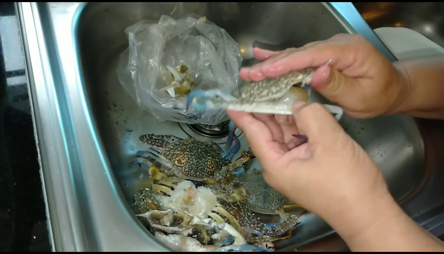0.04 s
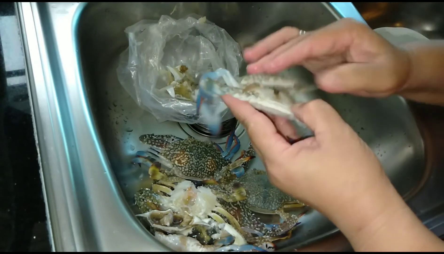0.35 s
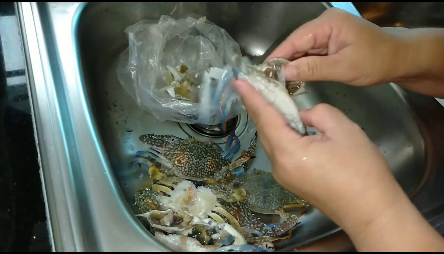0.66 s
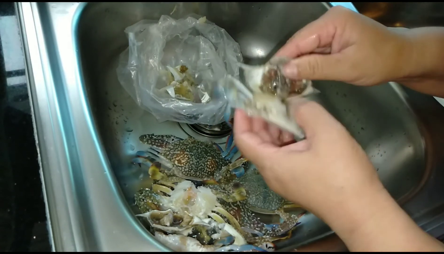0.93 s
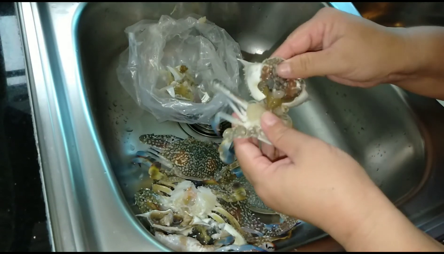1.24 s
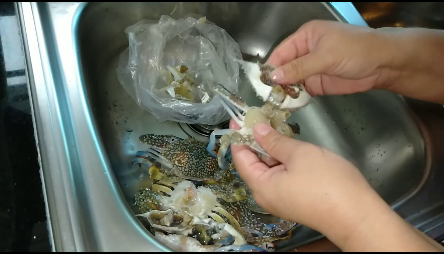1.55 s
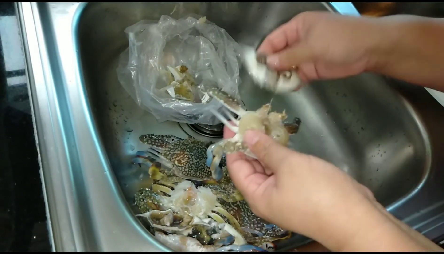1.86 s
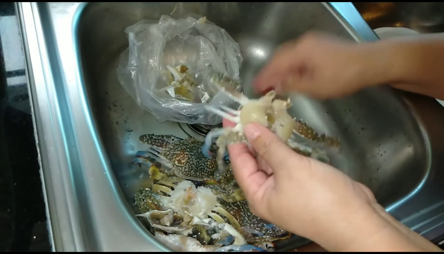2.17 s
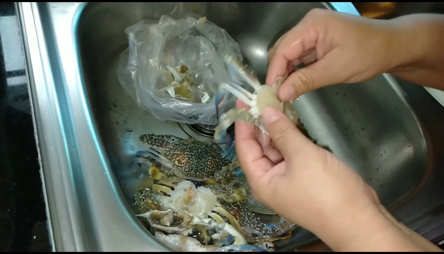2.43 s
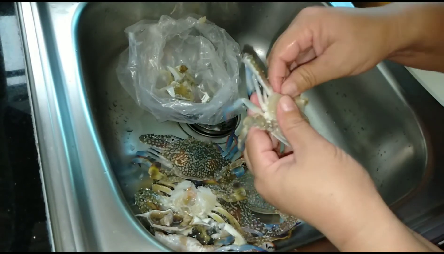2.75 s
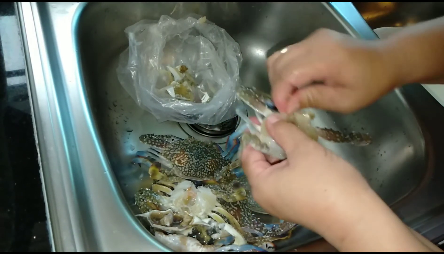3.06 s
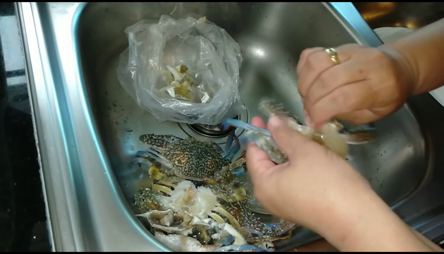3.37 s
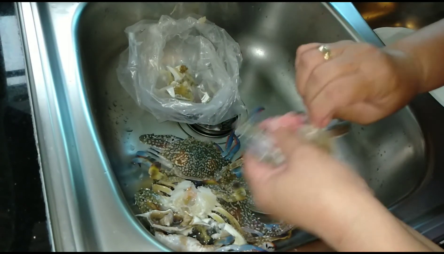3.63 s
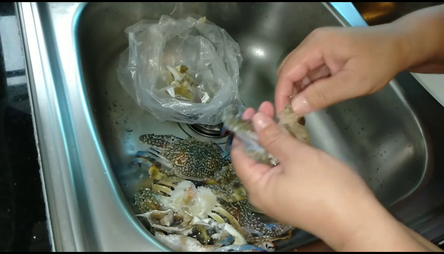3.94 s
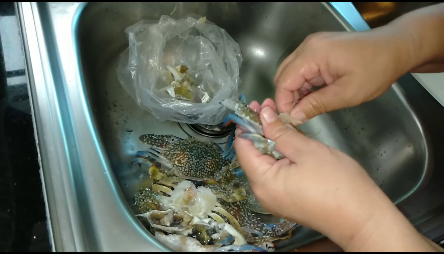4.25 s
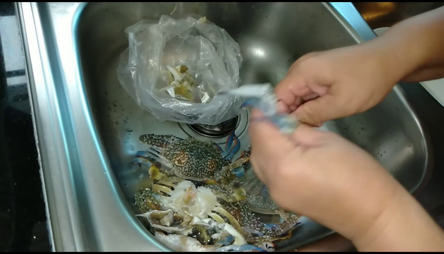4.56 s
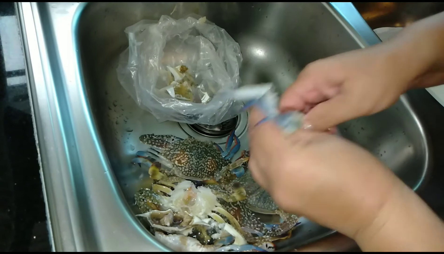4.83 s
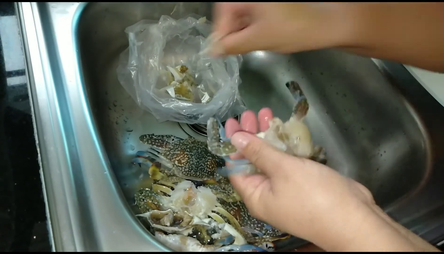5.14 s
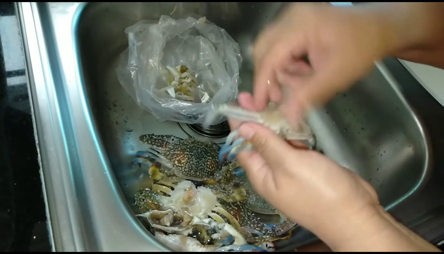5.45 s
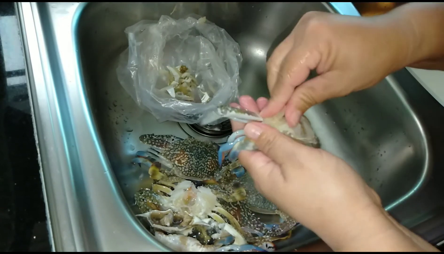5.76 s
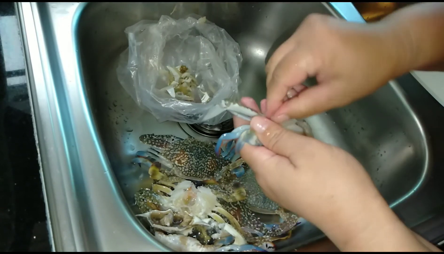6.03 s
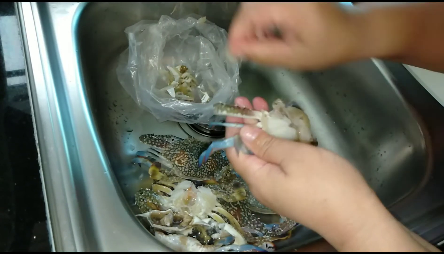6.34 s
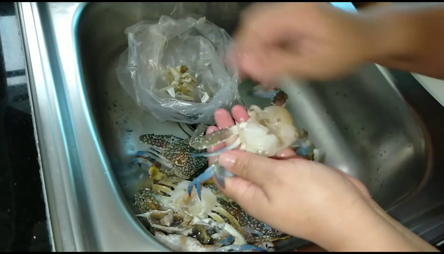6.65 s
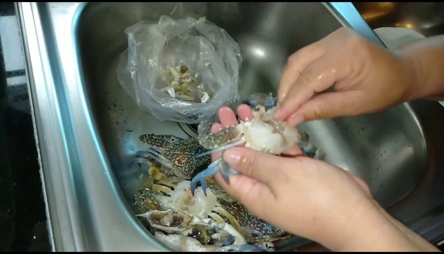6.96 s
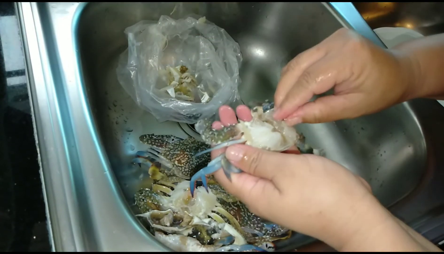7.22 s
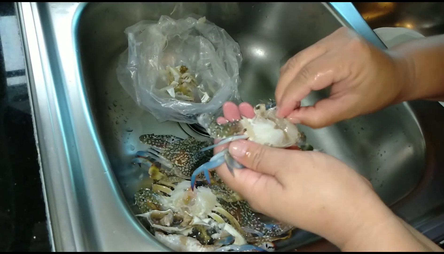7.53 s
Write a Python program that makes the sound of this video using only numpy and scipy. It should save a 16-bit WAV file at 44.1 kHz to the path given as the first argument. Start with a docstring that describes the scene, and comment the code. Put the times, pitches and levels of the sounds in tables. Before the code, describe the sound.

A fan whirs steadily in a kitchen while a raw crab is pulled apart close by, its shell snapping and its flesh faintly squelching. The loudest moment comes early, when the loose shell bounces in the steel basin with bright clacks and ringing thuds. Then a low, distant engine rumble creeps in and rises as small pieces keep cracking and two scraps drop into a plastic bag with short crinkles.

```python
"""A steel kitchen sink, a fan humming behind it. Close to the microphone, hands pull a raw crab apart:
flesh squelches, wet tissue tears and the shell cracks. Just after two seconds the top shell snaps off
and clatters into the basin, which thuds and rings. From about three seconds a distant engine comes in
and slowly gathers speed, booming in the room. Small pieces go on cracking, and near five and a half
and six and a half seconds scraps land in a plastic bag."""
import sys
import numpy as np
from scipy import signal
from scipy.fft import rfft, irfft
from scipy.io import wavfile

SR = 44100
rng = np.random.default_rng(int(sys.argv[2]) if len(sys.argv) > 2 else 0)


def unload_wav(signal):
    """Save mono or channel-first audio to the path in sys.argv[1] as 16-bit WAV at rate SR, clipped to [-1, 1]."""
    wavfile.write(
        sys.argv[1],
        SR,
        np.round(np.clip(np.atleast_2d(signal).T, -1, 1) * 32767).astype(np.int16),
    )


N = 334719


def amp(db):
    """Decibels to gain."""
    return 10 ** (np.asarray(db) / 20)


def unit(x):
    """Scales to rms 1."""
    return x / np.sqrt(np.mean(x ** 2) + 1e-20)


def unit_attack(x):
    """Scales a short sound to rms 1 over its first 10 ms."""
    return x / np.sqrt(np.mean(x[:SR // 100] ** 2) + 1e-20)


def curve_at(points, hz):
    """Interpolates a table on a log-frequency axis."""
    point_hz, value = np.transpose(points)
    return np.interp(np.log(hz + 1), np.log(point_hz), value)


def add(mix, start, sound):
    """Mixes a sound in at a start time in seconds."""
    part = mix[max(round(start * SR), 0):][:len(sound)]
    part += sound[:len(part)]


def band(x, lo_hz, hi_hz, order=2):
    """Causal band-pass."""
    sections = signal.butter(order, [lo_hz, min(hi_hz, SR / 2 - 1)], "band", fs=SR, output="sos")
    return signal.sosfilt(sections, x)


def resonate(x, hz, width_hz):
    """One resonance of gain 1."""
    return signal.lfilter(*signal.iirpeak(hz, hz / width_hz, fs=SR), x)


def drift(rate_hz):
    """Slow random wandering of rms 1."""
    hz = np.fft.rfftfreq(N, 1 / SR)
    return unit(irfft(rfft(rng.standard_normal(N)) * np.exp(-(hz / rate_hz) ** 2) * (hz > 0), N))


# Air from the fan behind the sink. Each row: frequency in Hz, relative spectral density in dB.
FAN_AIR = [(25, -1), (55, -1.3), (90, -1), (135, -1.5), (230, -10), (340, -8.5), (490, -12), (620, -7),
           (1250, -7), (1800, -12.5), (2600, -17.5), (3600, -24.5), (5000, -32.5), (9000, -49.5)]
# Its duct resonances. Each row: frequency in Hz, level in dB, width in Hz.
DUCT_TONES = [(188, -67.5, 3.4), (261, -77, 6.9), (393.3, -62.5, 25), (586.4, -72.5, 9.1), (990, -73, 17.2)]
# The fan comes up gently in the first second. Each row: time in seconds, gain in dB.
FAN_SWELL = [(0, -2), (.45, -2.6), (.85, 0), (7.59, 0.42)]

def fan(air_db=-52.5, mains_db=-57.5, mains_hz=100):
    """Steady rushing air with a mains hum and a few wavering duct resonances."""
    t, hz = np.arange(N) / SR, np.fft.rfftfreq(N, 1 / SR)
    air = unit(irfft(rfft(rng.standard_normal(N)) * amp(curve_at(FAN_AIR, hz)), N))
    out = amp(air_db) * air
    out += amp(mains_db) * np.sqrt(2) * np.sin(2 * np.pi * mains_hz * t)
    for centre_hz, db, width in DUCT_TONES:
        wavering_hz = centre_hz + width / 2 * drift(1 + width)
        out += amp(db) * np.sqrt(2) * np.sin(2 * np.pi * np.cumsum(wavering_hz) / SR)
    return out * amp(np.interp(t, *np.transpose(FAN_SWELL)))


# Wet flesh sucks air as it parts, close to the microphone.
# Each row: start in seconds, length in seconds, level in dB, pitch in Hz.
FLESH_SQUELCHES = [(.001, 0.063, -65.5, 3380), (0.663, 0.46, -64.5, 1840), (0.958, .11, -68, 3420),
                   (1.508, 0.011, -59.5, 6400), (2.01, 0.12, -79, 6500), (3.596, 0.15, -68, 6440),
                   (4.7, 0.127, -75, 6400), (4.928, 0.16, -76, 5500)]

def squelches(bubbles_per_s=2500, relative_width=0.46):
    """Tiny bubbles burst in a narrowing wet gap: a quick rise and a slower fade."""
    out = np.zeros(N)
    for start, length, db, hz in FLESH_SQUELCHES:
        progress = np.linspace(0, 1, round(length * SR))
        pops = rng.standard_normal(len(progress)) * (rng.random(len(progress)) < bubbles_per_s / SR)
        fizz = resonate(resonate(pops, hz, relative_width * hz), hz, relative_width * hz)
        envelope = np.minimum(progress / 0.031, 1) * (1 - progress)
        add(out, start, amp(db) * unit(fizz * envelope))
    return out


def wet_fingers(ticks_per_s=7, db=-47):
    """Wet fingers make faint stray ticks all along."""
    sizes = amp(2.8 * np.minimum(rng.exponential(1, N), 2))
    ticks = sizes * (rng.random(N) < ticks_per_s / SR)
    return amp(db) * band(ticks, 2500, 6700)


# Pulls that tear tissue and chip the shell, close up.
# Each row: start in seconds, length in seconds, level in dB.
PULLS = [(0.212, 0.12, -57), (0.721, 0.15, -79), (2.128, .05, -75.5), (2.246, 0.14, -58.5),
         (3.227, 0.07, -75), (3.29, 0.074, -65), (3.725, 0.042, -63), (4.813, 0.089, -68.5),
         (4.892, 0.064, -63.5), (5.335, 0.055, -60), (6.215, 0.11, -68.5), (6.299, 0.053, -64),
         (6.586, .02, -57), (6.629, 0.025, -54)]

def tearing(fibres_per_s=1000, unevenness_db=5):
    """Wet fibres part one after another in a fine crackle that fades through each pull."""
    out = np.zeros(N)
    for start, length, db in PULLS:
        count = round(length * SR)
        progress = np.linspace(0, 1, count)
        sizes = amp(unevenness_db * np.minimum(rng.exponential(1, count), 3))
        snaps = sizes * rng.choice([-1, 1], count) * (rng.random(count) < fibres_per_s / SR)
        crackle = band(snaps, 5500, 17500, order=1)
        envelope = np.minimum(progress / 0.041, 1) * (1 - progress)
        add(out, start, amp(db) * unit(crackle * envelope))
    return out


def chip_rows(chips_per_s=40, ring_db=6, snap_db=8, scatter_db=5,
              low_hz=1440, high_hz=2030, crumble_s=0.0027):
    """Rows for fractures(): faint breaks at random in each pull, weaker as the tissue gives way."""
    rows = []
    for start, length, db in PULLS:
        count = max(round(chips_per_s * length), 1)
        for progress, pitch, weakness in rng.random((count, 3)):
            level = db - scatter_db * weakness + 10 * np.log10(1 - progress)
            hz = low_hz + pitch * (high_hz - low_hz)
            rows.append((start + progress * length, level + ring_db, level + snap_db, hz, crumble_s))
    return rows


def fractures(rows, ring_db, snap_db, fizz_db, knock_db, ring_width_hz, splinters_per_s, splinter_size):
    """Each break is a jolt and a dying run of splinters; they ring the piece and radiate a snap."""
    out, t = np.zeros(N), np.arange(SR // 20) / SR
    for start, ring, snap, hz, crumble_s in rows:
        sizes = splinter_size * rng.standard_normal((2, len(t)))
        splinters = rng.random(len(t)) < splinters_per_s / SR
        jolts = sizes * splinters * np.exp(-t / crumble_s)
        jolts[:, 0] = 1  # the opening jolt
        force, crackle = band(jolts[0], hz / 2, hz * 1.67), jolts[1]
        # the curved plate has a close pair of modes; the lower one rings longer
        body = resonate(force, hz, ring_width_hz)
        body += amp(-5) * resonate(force, hz * 0.955, ring_width_hz / 2)
        recoil = band(crackle, 440, 1020)  # the whole piece knocks
        sound = amp(ring + ring_db) * unit_attack(body)
        sound += amp((ring + snap) / 2 + knock_db) * unit_attack(recoil)
        sound += amp(snap + snap_db) * unit_attack(band(crackle, 2600, 8700))
        sound += amp(snap + fizz_db) * unit_attack(band(crackle, 8500, 17000))
        add(out, start, sound)
    return out


# The main breaks of the shell, right at the microphone. Each row: start in seconds,
# relative ring and snap levels in dB, ring pitch in Hz, crumbling time in seconds.
SHELL_BREAKS = [(0.2161, -36.5, -33, 1820, 0.00067), (0.2365, -41.5, -64, 1680, 0.0084),
                (0.2628, -42.5, -49, 1710, 0.011), (0.3263, -30, -46, 1630, 0.0019),
                (0.7259, -54, -63, 1540, 0.0046), (0.815, -45.5, -61, 1800, .0025),
                (0.882, -52, -61, 1920, .0025), (2.0868, -45, -46.5, 1720, 0.0023),
                (3.6891, -61, -50, 1570, .0015), (3.7171, -45.5, -42.5, 2220, 0.0046),
                (4.8215, -62, -50, 2150, .003), (4.9083, -58, -48.5, 1600, 0.0051),
                (7.5528, -57.5, -60, 1550, 0.002)]

def shell_cracks():
    """The shell gives way in the hands; breaks and small chips each ring briefly at their own pitch."""
    return fractures(SHELL_BREAKS + chip_rows(), ring_db=1.5, snap_db=-5, fizz_db=-8.5, knock_db=-11,
                     ring_width_hz=360, splinters_per_s=6000, splinter_size=0.74)


# Thin, high ticks of membranes snapping, close up. Each row: start in seconds, relative level in dB.
MEMBRANE_SNAPS = [(0.289, -47.5), (0.364, -57.5), (0.769, -56), (2.1496, -64), (3.1234, -55.5),
                  (3.2257, -58), (3.298, -57), (4.2276, -61.5), (4.856, -52.5)]

def membranes(gain_db=-4, fade_s=0.0033):
    """A wet film lets go: a few milliseconds of fine spray with no ring."""
    out, t = np.zeros(N), np.arange(SR // 20) / SR
    for start, db in MEMBRANE_SNAPS:
        spray = rng.standard_normal(len(t)) * np.exp(-t / fade_s)
        add(out, start, amp(db + gain_db) * unit_attack(band(spray, 6500, 16500, order=1)))
    return out


# The top shell bounces in the basin, below the microphone. Each row: start in seconds,
# relative ring and snap levels in dB, ring pitch in Hz, crumbling time in seconds.
SHELL_BOUNCES = [(2.2173, -34, -43, 2580, 0.0023), (2.252, -26.5, -37.5, 1700, 0.0026),
                 (2.2957, -40, -64, 2680, 0.0038), (2.3186, -37.5, -41, 1710, 0.0024),
                 (2.3806, -67, -59, 2130, 0.0021), (2.418, -49.5, -59, 2800, 0.0047)]

def shell_clatter():
    """The loose shell hits the steel with a bright, splintery clack at each bounce."""
    return fractures(SHELL_BOUNCES, ring_db=-1.5, snap_db=-1.5, fizz_db=-1.5, knock_db=-12,
                     ring_width_hz=830, splinters_per_s=5700, splinter_size=1.5)


# Modes of the hollow top shell. Each row: frequency in Hz, relative level in dB, t60 in seconds.
SHELL_MODES = [(1440, -5, 0.082), (1600, 7.5, 0.05), (2250, -2, 0.06), (2550, -4, 0.06), (2940, 2, 0.089),
               (3310, -7, 0.11), (4330, -2, 0.055)]

def hollow_shell(gain_db=-6.5, contact_s=0.00134):
    """Every bounce rings the top shell; each point of contact favours other modes."""
    out, t = np.zeros(N), np.arange(SR // 4) / SR
    attack = 1 - np.exp(-t / contact_s)
    for start, ring, snap, *_ in SHELL_BOUNCES:
        shares = rng.uniform(0.45, 1.4, len(SHELL_MODES)) * rng.choice([-1, 1], len(SHELL_MODES))
        modes = sum(share * amp(db - 60 * t / t60) * np.sin(2 * np.pi * hz * t)
                    for share, (hz, db, t60) in zip(shares, SHELL_MODES))
        add(out, start, amp((ring + snap) / 2 + gain_db) * modes * attack)
    return out


# The shell's two heavy blows on the basin floor.
# Each row: start in seconds, relative level in dB, contact time in seconds.
BASIN_BLOWS = [(2.2516, -25, 0.0013), (2.319, -24.5, 0.0016)]
# Modes of the steel basin. Each row: frequency in Hz, relative level in dB, t60 in seconds.
BASIN_MODES = [(184.9, -1.5, 0.45), (296, -1, 0.15), (364, -7, 0.47), (431, 2, 0.37), (542, -14, .33),
               (675.6, 1, 0.24), (688, -4, 0.23), (759, -4.5, 0.41), (935, -4.5, 0.24), (1314, -9, .27)]

def basin(thud_db=-2, ring_db=-12, sheet_db=-14, sheet_t60=0.31):
    """Each blow dents the steel floor for a few cycles and leaves its modes ringing."""
    out, t = np.zeros(N), np.arange(SR * 3 // 4) / SR
    ring = sum(amp(db - 60 * t / t60) * np.sin(2 * np.pi * hz * t) for hz, db, t60 in BASIN_MODES)
    ring *= 1 - np.exp(-t / 0.0058)
    for start, db, contact_s in BASIN_BLOWS:
        push = np.exp(-t / contact_s) - np.exp(-2 * t / contact_s)
        thud = resonate(band(push, 420, 2500), hz=410, width_hz=200)
        thud -= resonate(thud, hz=238, width_hz=110)  # the sheet hardly moves between its lowest modes
        # the many weaker modes of the sheet blur into a short rattle
        rattle = band(rng.standard_normal(len(t)), 380, 4000, order=6)
        sheet = unit(band(rattle, 290, 850, order=1)) * amp(-60 * t / sheet_t60)
        blow = amp(thud_db) * unit_attack(thud) + amp(ring_db) * ring + amp(sheet_db) * sheet
        add(out, start, amp(db) * blow)
    return out


# A distant engine, heard through the walls. Each entry: a multiple of the shaft speed.
SHAFT_ORDERS = (3, 4, 6, 8)
# Low resonances of the room. Each row: frequency in Hz, level in dB, width in Hz.
ROOM_BOOMS = [(69.5, -53.5, 5.2), (76.4, -52.5, 6), (81.4, -52.5, 4), (88.5, -48.5, 1.3),
              (118.3, -55.5, 4.4), (126.4, -52.5, 2.9), (136.9, -56, 4), (169, -65, 6)]

def engine(start_s=3.5, start_hz=17.62, top_hz=26.7, speed_up_s=4.4, fade_s=0.67,
           rumble_db=-68, rumble_growth_db=12, waver_db=1):
    """The shaft speeds up over a growing rumble; each order booms as it climbs through a resonance."""
    since = np.arange(N) / SR - start_s
    shaft_hz = top_hz + (start_hz - top_hz) * np.exp(-since / speed_up_s)
    shaft_turns = np.cumsum(shaft_hz) / SR
    progress = np.maximum(since / since[-1], 0)
    rumble = unit(band(rng.standard_normal(N), 52, 169, order=3))
    rumble_fade = np.clip(1 + since / fade_s, 0, 1)  # the rumble arrives ahead of the tones
    tone_fade = np.clip(since / fade_s, 0, 1) ** 2
    out = amp(rumble_db + rumble_growth_db * progress ** 4) * rumble * rumble_fade
    for order in SHAFT_ORDERS:
        boom_power = sum(amp(db) ** 2 / (1 + 2 * ((order * shaft_hz - hz) / width) ** 2) ** 2
                         for hz, db, width in ROOM_BOOMS)
        tone = np.sqrt(2) * np.sin(2 * np.pi * (order * shaft_turns + rng.random()))
        out += np.sqrt(boom_power) * amp(waver_db * drift(3.2)) * tone * tone_fade
    return out


# Scraps land in the plastic bag, below the hands. Each row: start in seconds,
# relative ring and snap levels in dB, ring pitch in Hz, crinkling time in seconds.
BAG_LANDINGS = [(5.329, -56, -53, 1600, 0.0053), (5.3365, -49.5, -49, 1750, 0.011),
                (5.368, -52.5, -57, 1680, 0.0039), (6.587, -46.5, -47.5, 1460, 0.0043),
                (6.6275, -47.5, -49, 1710, 0.0027), (6.6364, -47.5, -50, 1780, 0.0033)]

def plastic_bag():
    """Each scrap crinkles the plastic: a run of tiny snaps with hardly any ring."""
    return fractures(BAG_LANDINGS, ring_db=1, snap_db=-2, fizz_db=-6, knock_db=-10,
                     ring_width_hz=2200, splinters_per_s=4200, splinter_size=1.5)


# The tiled kitchen around the microphone. Each row: frequency in Hz, t60 in seconds.
KITCHEN_DECAY = [(150, 0.7), (500, 0.39), (1700, 0.42), (7000, 0.49), (15000, 0.34)]

def sink_and_room(x, wall_db, wall_t60, room_db):
    """The basin walls answer within milliseconds; the tiled kitchen adds a soft tail."""
    count = SR * 3 // 4
    t = np.arange(count) / SR
    signs = rng.choice([-1., 1.], (2, count))
    walls = signs[0] * (rng.random(count) < 1500 / SR) * (t > 0.0012) * amp(-60 * t / wall_t60)
    reflections = signs[1] * (rng.random(count) < 4000 / SR) * (t > 0.008)
    hz, frame_s, spectrum = signal.stft(reflections, SR, nperseg=256)
    decay = amp(-60 * frame_s / curve_at(KITCHEN_DECAY, hz)[:, None])
    tail = signal.istft(spectrum * decay, SR, nperseg=256)[1][:count]
    echo = amp(wall_db) * walls / np.linalg.norm(walls) + amp(room_db) * tail / np.linalg.norm(tail)
    return x + signal.fftconvolve(x, echo)[:N]


def scene():
    """One microphone: hands close by, basin floor and bag further down, fan and engine behind."""
    near = shell_cracks() + squelches() + tearing() + membranes() + wet_fingers()
    below = shell_clatter() + plastic_bag() + basin() + hollow_shell()
    out = sink_and_room(near, wall_db=-7, wall_t60=0.066, room_db=-11.5)
    out += sink_and_room(below, wall_db=-5, wall_t60=0.034, room_db=-10.5)
    return (out + fan() + engine())[None]


def record(dry, hiss_db=-71, port_hz=6900, port_width_hz=1100, port_db=9, cutoff_hz=15700):
    """A small microphone with a little hiss, a resonant port and a steep treble limit."""
    x = dry + amp(hiss_db) * rng.standard_normal(dry.shape)
    x += amp(port_db) * resonate(x, port_hz, port_width_hz)
    low_pass = signal.firwin(401, cutoff_hz, window=("kaiser", 8), fs=SR)
    return signal.oaconvolve(x, low_pass[None], "same")


dry = scene()
out = record(dry)
unload_wav(out)
```